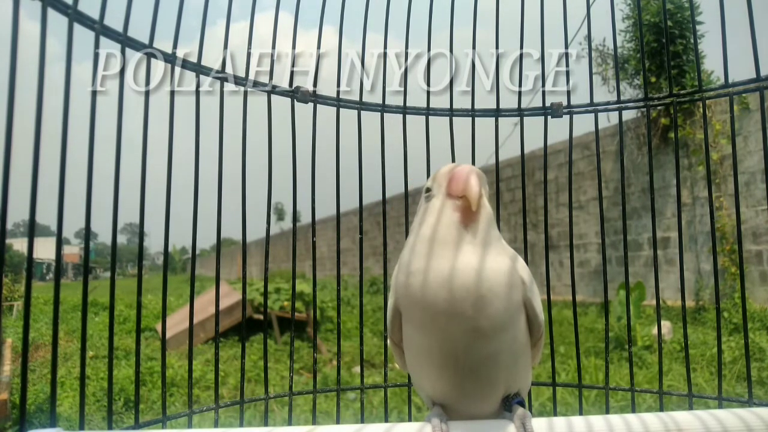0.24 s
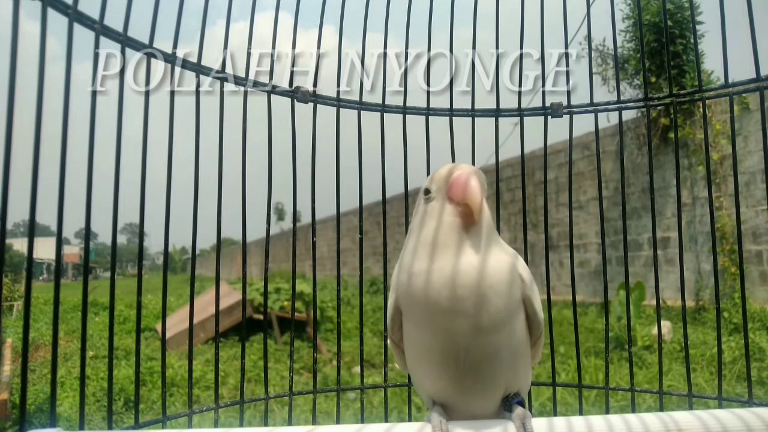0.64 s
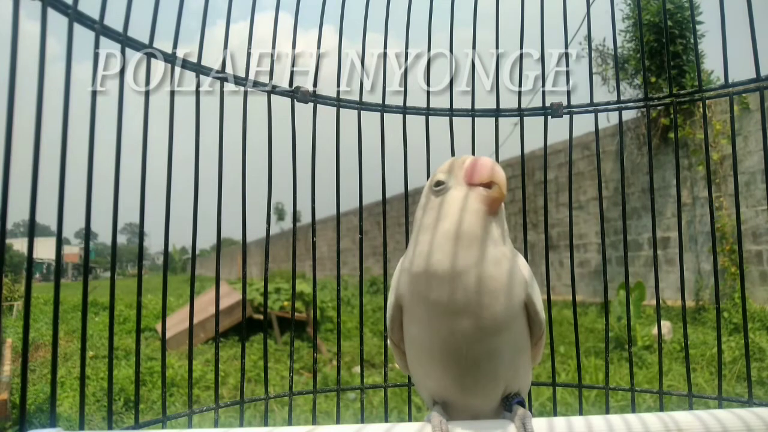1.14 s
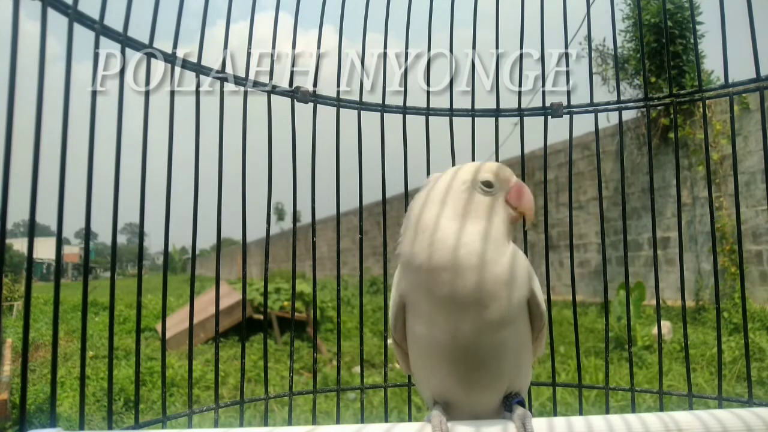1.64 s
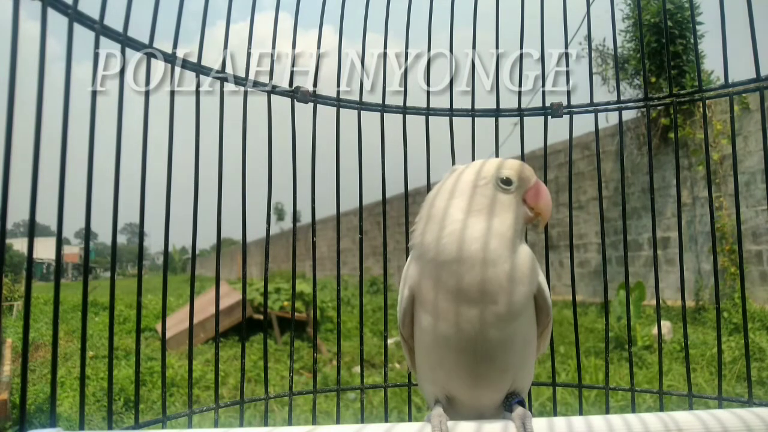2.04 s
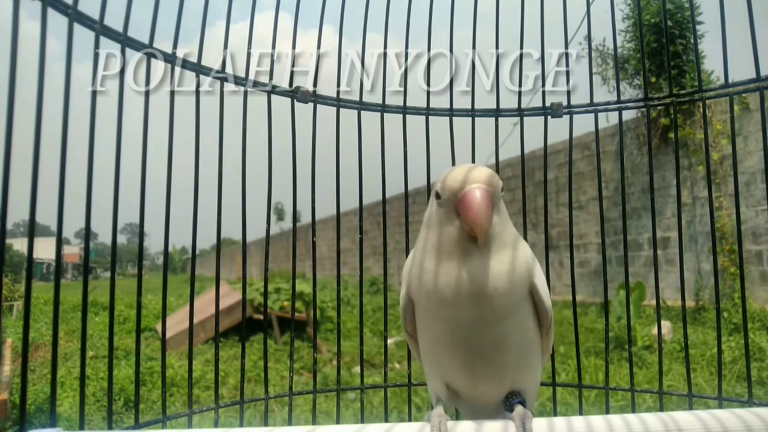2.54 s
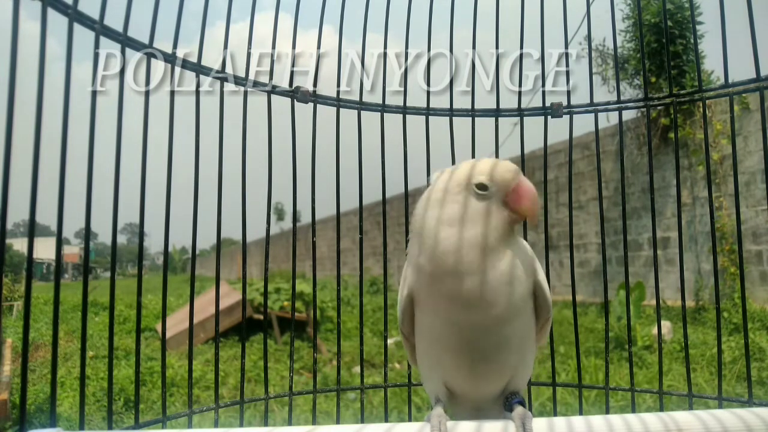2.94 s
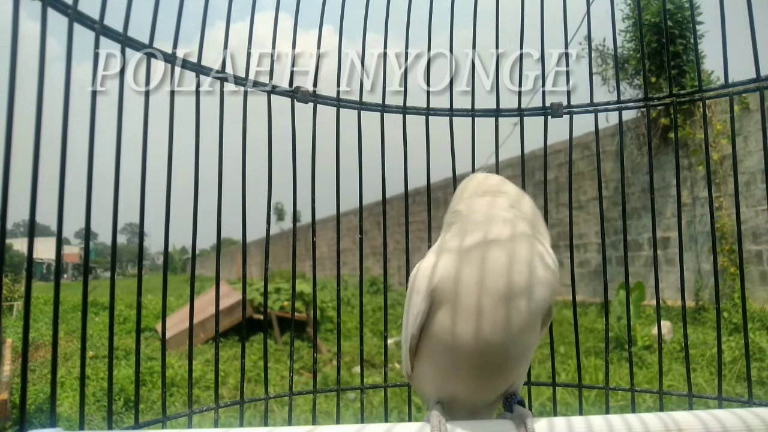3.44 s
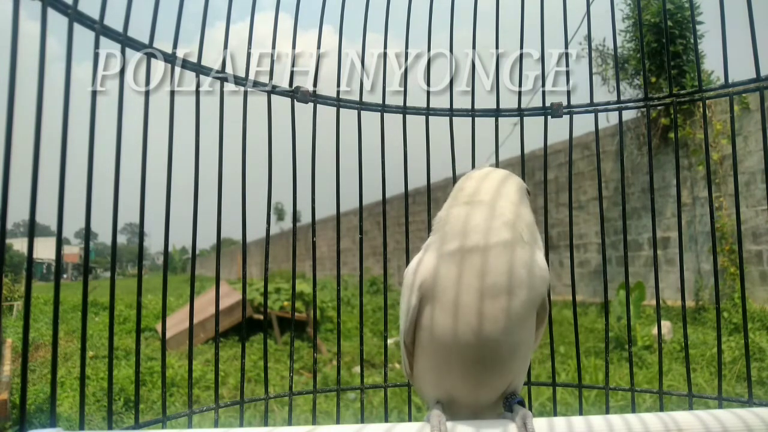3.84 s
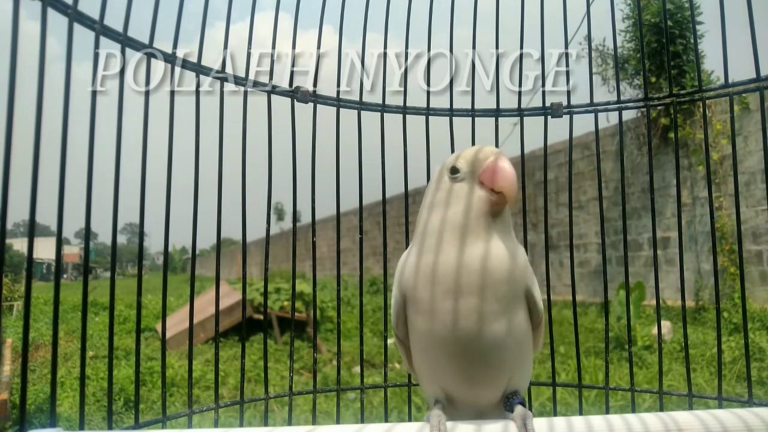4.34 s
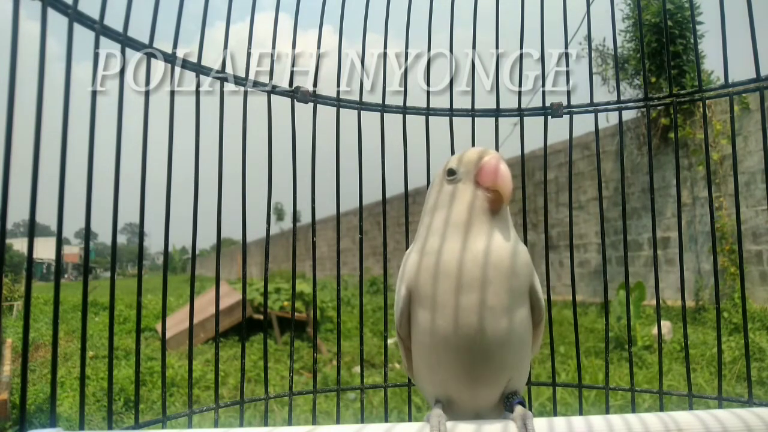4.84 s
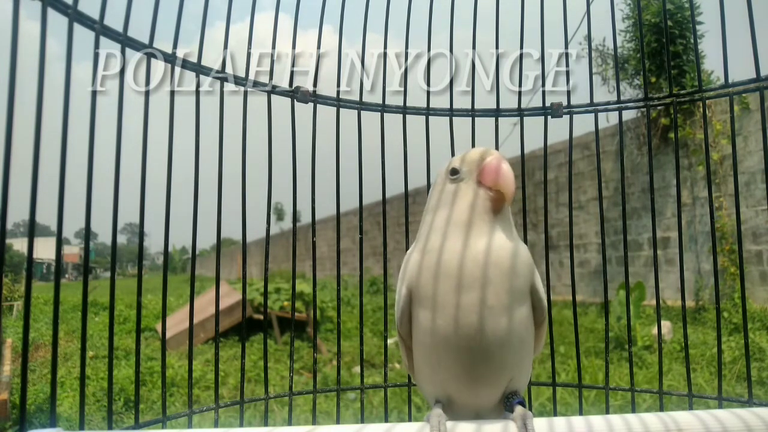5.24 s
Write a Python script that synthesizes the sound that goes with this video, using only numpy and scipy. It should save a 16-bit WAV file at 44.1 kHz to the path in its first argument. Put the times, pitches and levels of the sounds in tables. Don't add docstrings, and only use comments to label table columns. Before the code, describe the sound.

Close sharp bird chirps and screeches, spaced by tiny beak snaps, with a far cock crowing, a steady high insect buzz and light wind.

```python
import sys
import numpy as np
from scipy import signal
from scipy.fft import rfft, irfft
from scipy.io import wavfile
from scipy.ndimage import uniform_filter1d

SR = 44100
rng = np.random.default_rng(int(sys.argv[2]) if len(sys.argv) > 2 else 0)


def transcribe(u):
    v = np.clip(np.atleast_2d(u).T, -1, 1)
    q = np.round(v * 32767).astype(np.int16)
    wavfile.write(sys.argv[1], SR, q)


def amplitude_ratio(level_db):
    exponent = np.asarray(level_db, float) / 20
    return 10 ** exponent


N = 241668


def evened(x):
    return x / np.sqrt(np.mean(x ** 2) + 1e-20)


def read(points, hz):
    f, value = np.transpose(points)
    return np.interp(np.log(hz + 1), np.log(f + 1), value)


def unroll(rows):
    s, *columns = np.transpose(rows)
    t = np.arange(s[0], s[-1], 1 / SR)
    return [np.interp(t, s, c) for c in columns]


def add(mix, s, sound):
    part = mix[round(s * SR):][:len(sound)]
    part += sound[:len(part)]


def drift(length, hz, size=N):
    lowpass = signal.butter(4, hz, fs=SR, output="sos")
    smooth = signal.sosfilt(lowpass, rng.standard_normal(size + 2000))
    return evened(smooth[2000:])[:length]


def resonate(x, hz, width):
    turn = np.exp(2j * np.pi * hz * np.arange(len(x)) / SR)
    r = np.exp(-np.pi * width / SR)
    return 2 * (turn * signal.lfilter([1 - r], [1, -r], x / turn)).real


def resonate_twice(x, hz, width):
    return resonate(resonate(x, hz, width), hz, width)


def coloured(spectrum, patchy_db):
    a, b, patches = rng.standard_normal((N // 256 + 5, 513, 3)).T
    patches = uniform_filter1d(patches, size=10, axis=0)
    patches = evened(uniform_filter1d(patches, size=12, axis=1))
    level_db = read(spectrum, np.fft.rfftfreq(1024, 1 / SR))[:, None]
    cells = (a + 1j * b) * amplitude_ratio(level_db + patchy_db * patches)
    return evened(signal.istft(cells, nperseg=1024, noverlap=768)[1][:N])


# freq_hz, width_hz, level_db
ENGINE_BANDS = [(181, 3.4, -57.5), (190, 72, -65), (390, 18, -69)]


def engine_hum():
    return sum(amplitude_ratio(db) * evened(resonate(rng.standard_normal(N), hz, width)) for hz, width, db in ENGINE_BANDS)


# freq_hz, level_db (per Hz)
HISS_SPECTRUM = [(500, -2.5), (1000, 0), (1500, -2), (2700, -2), (4500, -6.5), (7000, -5.5), (8600, -6),
                 (10600, -9), (11400, -18), (15500, -18)]
# time_s, level_db
HISS_LEVEL = [(0, -62), (1.55, -59), (2.2, -61.5), (3.3, -59), (4.2, -64.5), (4.7, -68), (5.3, -68),
              (5.49, -63.5)]


def far_hiss():
    return amplitude_ratio(unroll(HISS_LEVEL)[0][:N]) * coloured(HISS_SPECTRUM, patchy_db=2.5)


# freq_hz, level_db (per Hz)
WIND_SPECTRUM = [(8.8, -29), (15, 1.5), (64, 6), (81, -3.5), (135, -16), (188, -11), (292, -21), (367, -21),
                 (1000, -40), (1300, -66), (2200, -120)]


def wind():
    mean_db, gust_db = -40.5, 1
    return amplitude_ratio(mean_db + gust_db * drift(N, 2.2)) * coloured(WIND_SPECTRUM, patchy_db=1.5)


# start_s, end_s, freq_hz, width_hz, level_db
FAINT_BANDS = [
    (-.1, 0.08, 6140, 2900, -55),
    (1, 3.11, 114.4, 6.5, -52.5),
    (4.595, 5.5, 2657, 9.4, -81),
]


def faint():
    t, out = np.arange(N) / SR, np.zeros(N)
    for start, end, hz, width, db in FAINT_BANDS:
        swell = np.sin(np.pi * np.clip((t - start) / (end - start), 0, 1))
        out += amplitude_ratio(db) * swell * evened(resonate_twice(rng.standard_normal(N), hz, width))
    return out


# pulse_rate_hz, ring_hz, width_hz, level_db
INSECT_SWARM = [(97.2, 9950, 800, 0), (95.6, 9700, 900, -3), (98.8, 10250, 800, -4), (93, 9400, 800, -9)]


def insects():
    out = np.zeros(N)
    for rate_hz, hz, width, db in INSECT_SWARM:
        turns = np.cumsum(rate_hz * (1 + 0.0033 * drift(N, 5.7))) / SR
        bursts = (0.27 + np.exp(-(turns % 1) / .22)) * rng.standard_normal(N)
        out += amplitude_ratio(db + 1.0 * drift(N, 0.72)) * evened(resonate_twice(bursts, hz, width))
    lowpass = signal.cheby2(8, 30, 11100, fs=SR, output="sos")
    return amplitude_ratio(-56) * evened(signal.sosfilt(lowpass, out))


# time_s, pitch_hz, throat_tone_db, beak_resonance_hz
CROW_SYLLABLES = [
    [(2.52, 588, -68, 1800), (2.56, 615, -58, 1810), (2.64, 618, -63, 1597), (2.73, 604, -78, 1580)],
    [(2.82, 660, -60, 2020), (2.93, 735, -48, 2075), (3.1, 712, -51.5, 2140), (3.28, 712, -45.5, 2080),
     (3.4, 685, -58, 1950), (3.5, 661, -69, 1900)],
    [(3.63, 693, -66, 2100), (3.72, 688.7, -50.5, 2030), (3.9, 738, -50, 1526), (4.03, 745, -79, 1490),
     (4.18, 746, -65, 1490), (4.25, 720, -50, 1160), (4.31, 685, -56, 1055), (4.37, 690, -83, 1000)],
]
# beak_resonance_db, lowest_ring_db, upper_rings_db
CROW_LEVELS = [(-60.5, -59, -76.5), (-58.5, -69.5, -78.5), (-66.5, -84.5, -77)]
# freq_hz, width_hz, level_db
CROW_HIGH_RINGS = [(5790, 270, 1), (7636, 740, 10), (14100, 500, -10.5)]


def rooster():
    beak_width_hz, edge_s, edge_fall_db = 370, 0.038, -10
    out = np.zeros(N)
    for rows, (beak_db, ring_db, upper_db) in zip(CROW_SYLLABLES, CROW_LEVELS):
        hz, tone_db, beak_hz = unroll(rows)
        t = np.arange(len(hz)) / SR

        def waver(rate_hz):
            return drift(len(hz), rate_hz, size=SR)

        edge_db = edge_fall_db * np.clip(1 - np.minimum(t, t[-1] - t) / edge_s, 0, 1)
        gains = [amplitude_ratio(tone_db)]
        for k in (2, 3):
            gains.append(amplitude_ratio(beak_db + edge_db) / (1 + ((k * hz - beak_hz) / beak_width_hz) ** 2))
        turns = np.cumsum(hz * (1 + .004 * waver(12) + .005 * waver(150))) / SR
        low = 0
        for k, gain in enumerate(gains, 1):
            swell = 1.39 + 0.36 * k * waver(12 * k ** 2 + 20)
            low = low + gain * swell * np.cos(2 * np.pi * k * turns)
        partials = sum(np.cos(2 * np.pi * k * turns) for k in range(4, 21)) * (1 + .9 * waver(60))
        high = 0
        ringing = partials
        for (f, w, db), own_db in zip(CROW_HIGH_RINGS, (ring_db, upper_db, upper_db)):
            high = high + amplitude_ratio(db + own_db) * resonate_twice(partials, f, w)
        add(out, rows[0][0], low + amplitude_ratio(edge_db) * high)
    return out


# start_s, peak_db
AIR_PUFFS = [
    (0.0887, -44),
    (.093, -36.5),
    (1.334, -39),
    (3.112, -38.5),
]


def puffs():
    out, t, rise_s = np.zeros(N), np.arange(800) / SR, 0.0034
    for s, db in AIR_PUFFS:
        air = evened(resonate_twice(rng.standard_normal(800), 375.6, 1000))
        add(out, s, amplitude_ratio(db) * t / rise_s * np.exp(1 - t / rise_s) * air)
    return out


# freq_hz, level_db, t60_s
BEAK_RINGS = [(3300, -11, 0.0059), (5474, 10.5, 0.0012), (6600, -6, 0.0027), (8200, -1, 0.0061),
              (11100, -11, 0.0042), (13300, -4, .003), (15500, -7.5, .003)]


def click(low_hz, upper_db):
    t = np.arange(700) / SR
    rings = [(low_hz, 0, .008)]
    rings += [(hz, db + upper_db * (hz / 12000) ** 2, t60) for hz, db, t60 in BEAK_RINGS]
    sound = sum(amplitude_ratio(db - 60 * t / t60) * np.sin(2 * np.pi * (hz * t + rng.random())) for hz, db, t60 in rings)
    sound += amplitude_ratio(upper_db - 7.5 - 60 * t / 0.0082) * np.diff(rng.standard_normal(701))
    sound *= 1 - np.exp(-t / 0.0011)
    return sound / abs(sound).max()


# freq_hz, level_db
THROAT_RESPONSE = [(800, -40.5), (1800, -16), (2390, -11.5), (3080, -6), (4000, -13), (4850, 4.5),
                   (6100, -5), (7100, -15), (7900, -0.5), (9300, -17.5), (10400, -17), (11700, -6),
                   (13200, -13), (16500, -24)]


def note(rows, shake, beak, tilt_db, treble_db, second_db, air_db):
    hz, level_db = unroll(rows)
    size = len(hz)
    warble, throb, rough, rate_hz, phase = shake
    along = np.linspace(0, 1, size)
    flutter_hz = rate_hz * (1 + .05 * drift(size, 30, size=8000))
    flutter = np.cos(2 * np.pi * (phase + np.cumsum(flutter_hz) / SR))
    rough = np.clip(rough + 0.03 * np.maximum(level_db.max() - level_db - 7, 0), 0, 1)

    def throat(f):
        treble = treble_db / (1 + (9000 / (f + 1)) ** 8)
        top_loss_db = 14 * (f / 15500) ** 8
        return amplitude_ratio(read(THROAT_RESPONSE, f / beak) + treble - top_loss_db)

    k = np.arange(1, 15)[:, None] / 2
    half_pitch = np.where(k % 1, amplitude_ratio(-30.5) * 5 * rough, 1)
    source = amplitude_ratio(tilt_db * np.log2(k)) * half_pitch
    scale = np.sqrt(((source * throat(k * hz)) ** 2).sum(0) / 2)
    lag = 0.083 * k ** 2
    tone = 0
    for db, swing in (0, -1), (second_db, 1):
        f = hz * (1 + swing * warble * flutter)
        turns = np.cumsum(f * (1 + .08 * rough * drift(size, 490, size=8000))) / SR
        shimmer = 1 + .7 * rough * np.array([drift(size, 510, size=8000) for _ in k])
        strength = source * throat(k * f) * (k * f < SR / 2) * shimmer
        tone = tone + amplitude_ratio(db) * (strength * np.cos(2 * np.pi * (k * turns + lag))).sum(0)
    breath = rfft(rng.standard_normal(size=8000)) * throat(np.fft.rfftfreq(8000, 1 / SR))
    air = evened(irfft(breath))[:size]
    sound = tone / scale + amplitude_ratio(air_db) * (0.041 + 3 * rough) * air
    edges = np.clip(np.minimum(along, 1 - along) * size / 40, 0, 1)
    return amplitude_ratio(level_db) * (1 - np.clip(throb, 0, 1) * flutter) * edges * sound


# time_s, pitch_hz, level_db
CHIRP_NOTES = [
    [(.0775, 2273, -27), (.08, 2325, -16), (.084, 2340, -17.5), (.0865, 2490, -20.5)],
    [(.086, 2786, -29.5), (.0875, 3444, -12.5), (.0905, 3056, -14.5), (.0955, 3300, -14.5),
     (.0975, 3482, -24.5)],
    [(.0945, 3390, -23), (.0965, 3740, -7.5), (.1, 3895, -16), (.105, 3712, -11.5), (.109, 3597, -42.5)],
]
SCREECH_NOTES = [
    [(1.158, 3430, -26), (1.161, 3250, -16), (1.166, 2800, -16.5), (1.17, 2600, -13), (1.174, 2400, -22.5)],
    [(1.172, 2378, -18.5), (1.186, 2322, -7.5), (1.212, 2403, -8.5), (1.224, 2375, -9.5),
     (1.238, 2365, -7.5), (1.254, 2285, -13), (1.264, 2250, -21.5)],
    [(1.263, 2240, -30), (1.267, 2360, -9.5), (1.272, 2205, -15.5), (1.276, 2298, -28)],
    [(1.2755, 2770, -22.5), (1.278, 2830, -8.5), (1.31, 2670, -12.5), (1.331, 2815, -10),
     (1.347, 2740, -13.5), (1.356, 2770, -40)],
]
FALL_NOTES = [
    [(3.086, 5495, -21.5), (3.092, 6587, -18), (3.098, 6375, -5.5), (3.107, 5497, -7.5), (3.115, 6545, -7),
     (3.124, 6357, -8), (3.128, 5815, -13)],
    [(3.126, 5900, -13.5), (3.131, 4806, -11.5), (3.145, 4334, -11), (3.154, 3526, -9), (3.16, 3050, -15.5),
     (3.165, 2750, -26)],
    [(3.161, 2870, -28), (3.169, 2462, -18.5), (3.18, 2852, -23), (3.205, 2252, -25.5), (3.224, 2026, -29),
     (3.229, 1926, -49.5)],
    [(3.245, 2014, -45.5), (3.249, 1836, -25.5), (3.259, 1590, -40.5)],
]
RISE_NOTES = [
    [(5.383, 2178, -36.5), (5.387, 2081, -13), (5.39, 3197, -22.5), (5.3925, 2281, -13),
     (5.3965, 3370, -12), (5.399, 4434, -8.5), (5.4018, 3715, -11.5), (5.404, 4410, -7),
     (5.407, 4062, -24.5)],
    [(5.406, 2514, -25.5), (5.409, 2580, -8), (5.412, 2332, -3.5), (5.419, 3240, -19.5)],
    [(5.417, 4727, -14), (5.42, 5630, -7.5), (5.426, 5820, -9), (5.431, 6774, -7.5), (5.44, 6600, -6.5),
     (5.444, 6700, -20.5)],
    [(5.441, 6650, -17.5), (5.444, 6750, -12), (5.448, 6850, -14), (5.453, 6700, -24), (5.458, 6600, -52)],
]
# beak_opening_factor, source_tilt_db (per octave), treble_db, second_membrane_db, air_noise_db
WHISTLE = (1.02, -3, 3.5, -44.5, -27.5)
PIP = (.86, -2.5, 3, -39, -14.5)
RASP = (1.0, -1, 4, -8, -20)
SQUEAL = (0.83, -4.5, 7.5, -41.5, -19)
SLIDE = (1.56, -1.5, -15.5, -13, -11.5)
MURMUR = (1.2, -14.5, 2.5, -17.5, -12.5)
SWEEP = (1.0, -2, 7.5, -53, -14)
PEEP = (1.1, -15.5, 20, -32, -14.5)
CHIRR = (1.0, 0, 2.5, -9, -7)
NOTE_VOICINGS = [WHISTLE, CHIRR, PIP,
                 CHIRR, WHISTLE, PIP, RASP,
                 SQUEAL, SLIDE, MURMUR, PEEP,
                 SWEEP, SWEEP, SQUEAL, SQUEAL]
# warble (share of pitch), throb (0-1), roughness (0-1), flutter_hz, flutter_phase (turns)
NOTE_SHAKE = [(.003, 0.3, 0.2, 220, .09), (0.081, .35, 0.3, 290, 0.064), (0.0013, 0, 0.1, 620, .09),
              (.11, 0.3, .2, 190, 0.11), (0.001003, .05, 0.02, 69, .1), (0.0056, .2, 0, 210, .3),
              (.125, 0.2, 0.3, 176, 0.011), (.017, .5, .04, 195, 0.97), (.08, .25, .18, 160, .49),
              (0.093, 0, 0.2, 110, .99), (.01, 0.3, 0.1, 240, 0.59), (0.014, 0.4, 0.3, 160, 0.051),
              (0.0016, .2, .25, 150, 0.059), (.005, .3, .05, 270, .94), (0.00087, .05, 0.06, 200, 0.086)]
# start_s, peak_db, lowest_ring_hz, treble_db
BEAK_CLICKS = [(1.0216, -26.5, 2645, -2), (1.702, -21.5, 2620, -2.5), (2.2293, -24, 2640, 0.5),
               (2.7377, -21, 2666, -1.5), (4.5047, -22, 2640, -2), (5.2535, -23.5, 2612, 0),
               (3.3989, -33, 4010, -12.5), (3.4072, -26, 2450, -10), (3.4164, -29, 2003, -11),
               (1.155, -28, 3180, -17)]
# delay_s, level_db
CAGE_ECHOES = [(.0025, -15.5), (.0036, -20), (.0058, -27), (.0075, -18.5)]
# freq_hz, t60_s
YARD_DECAY = [(1500, .3), (4000, 0.12), (8000, 0.26), (14000, 0.21)]


def parrot():
    bird = np.zeros(N)
    calls = CHIRP_NOTES + SCREECH_NOTES + FALL_NOTES + RISE_NOTES
    for rows, shake, voicing in zip(calls, NOTE_SHAKE, NOTE_VOICINGS):
        add(bird, rows[0][0], note(rows, shake, *voicing))
    for s, peak_db, hz, upper_db in BEAK_CLICKS:
        add(bird, s, amplitude_ratio(peak_db) * click(hz, upper_db))
    hz, t, z = signal.stft(rng.standard_normal(SR // 2), SR, nperseg=256)
    tail = signal.istft(z * amplitude_ratio(-60 * t / read(YARD_DECAY, hz)[:, None]), SR, nperseg=256)[1]
    space = np.r_[np.zeros(200), amplitude_ratio(-25) * tail / np.linalg.norm(tail)]
    space[0] = 1
    for delay, db in CAGE_ECHOES:
        space[round(delay * SR)] += amplitude_ratio(db)
    bird = signal.sosfilt(signal.butter(2, 250, "high", fs=SR, output="sos"), bird)
    return signal.fftconvolve(bird, space)[:N]


def scene():
    background = engine_hum() + far_hiss() + wind() + faint() + insects() + rooster()
    return (background + puffs() + parrot())[None]


def top_cut(x):
    return signal.sosfilt(signal.butter(12, 15880, fs=SR, output="sos"), x)


def record(dry):
    lopsided = signal.sosfilt(signal.butter(2, 150, "high", fs=SR, output="sos"), dry ** 2)
    full = np.clip(dry + amplitude_ratio(-39.5) * lopsided, -1, 1)
    edge = signal.firwin(301, 15800, window=("kaiser", 9), fs=SR)
    return top_cut(signal.oaconvolve(full, edge[None], "same"))


dry = scene()
out = record(dry)
transcribe(out)
```